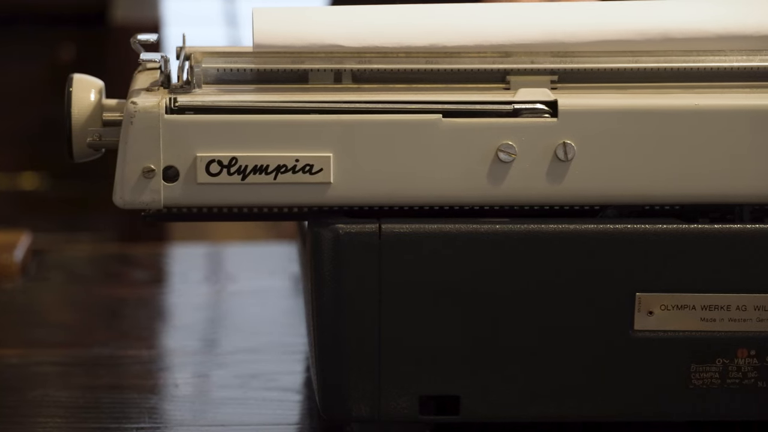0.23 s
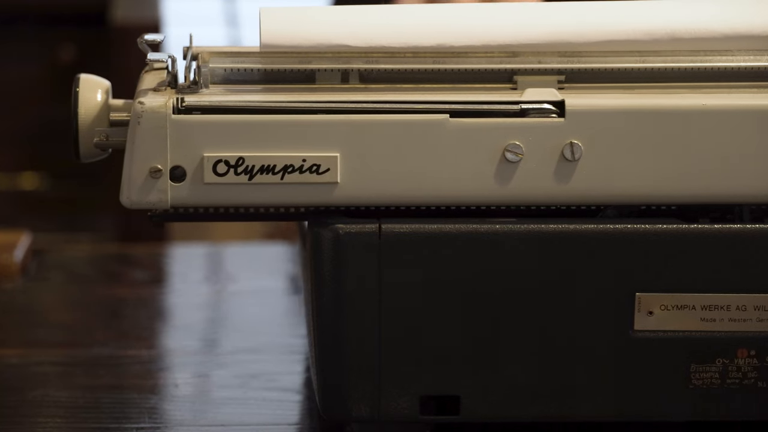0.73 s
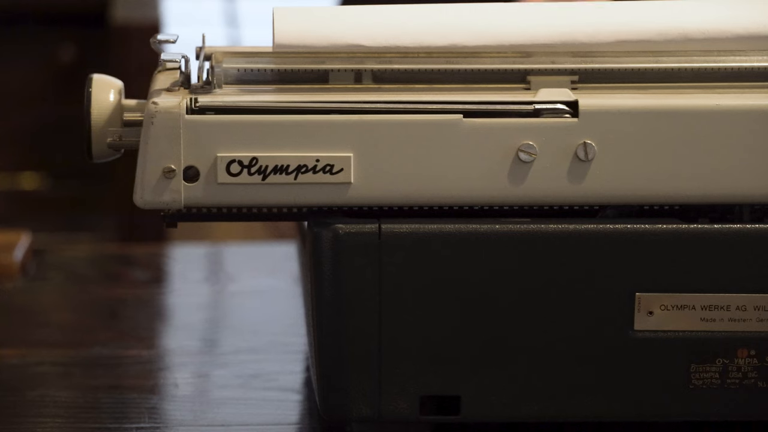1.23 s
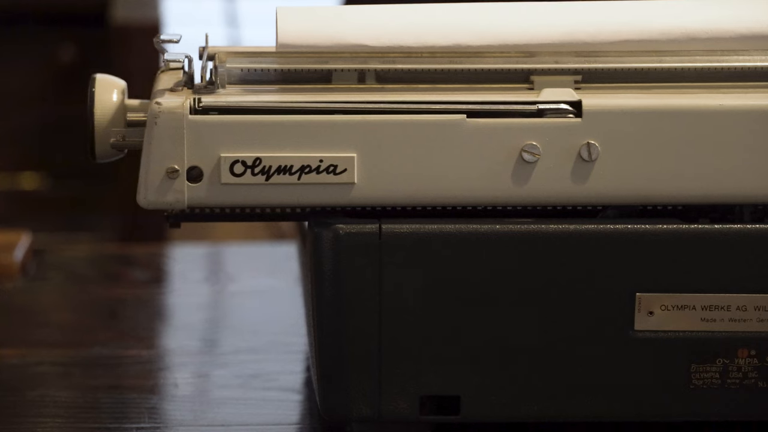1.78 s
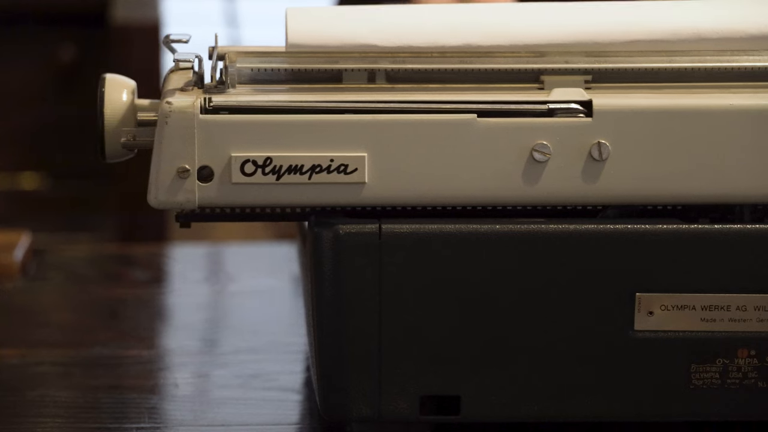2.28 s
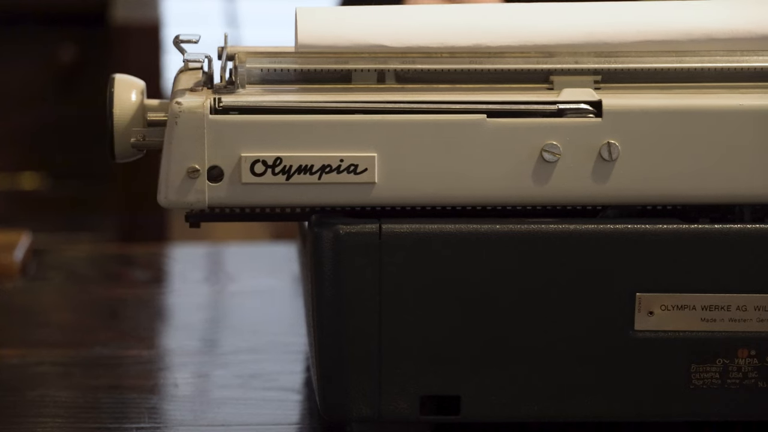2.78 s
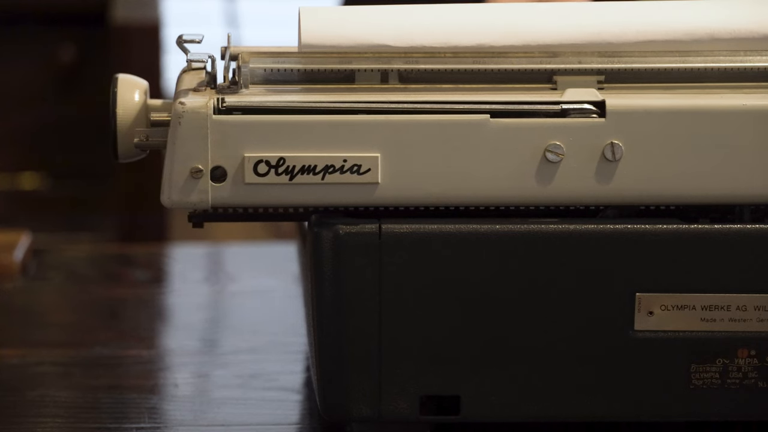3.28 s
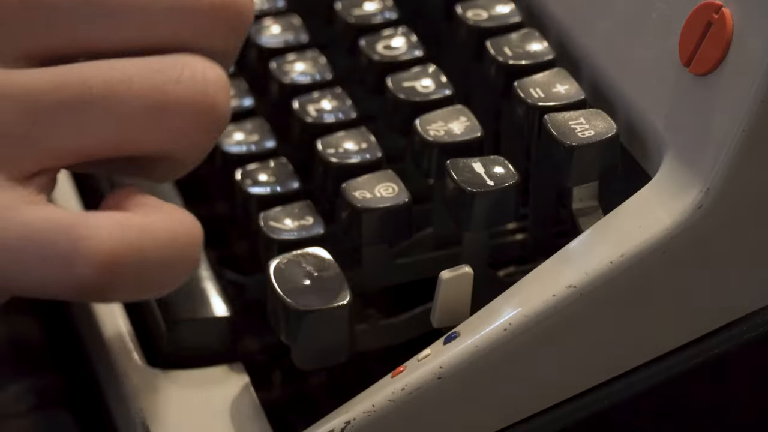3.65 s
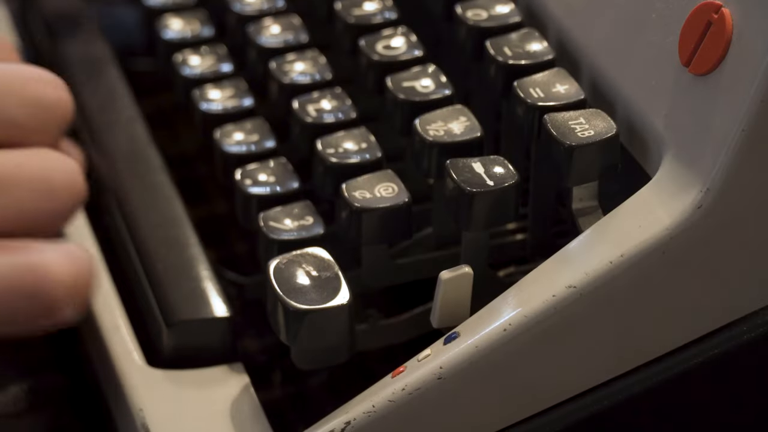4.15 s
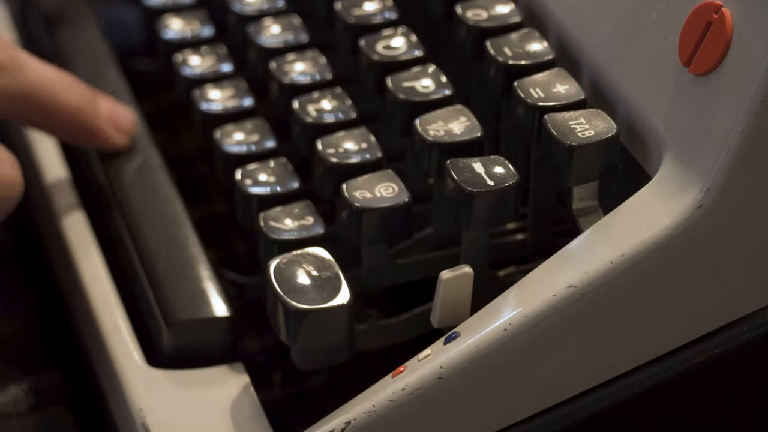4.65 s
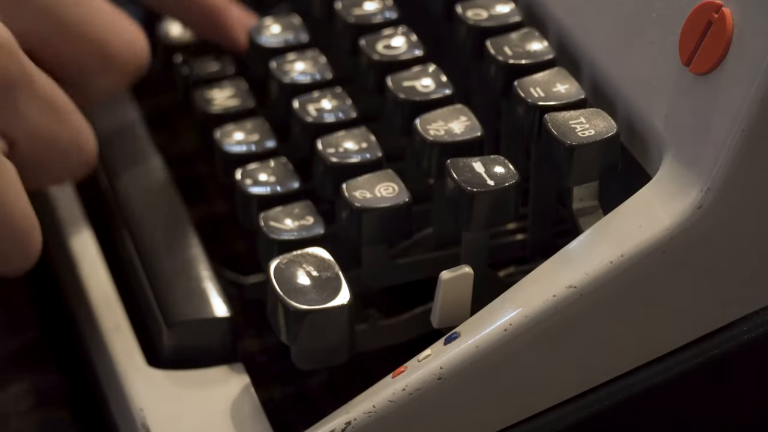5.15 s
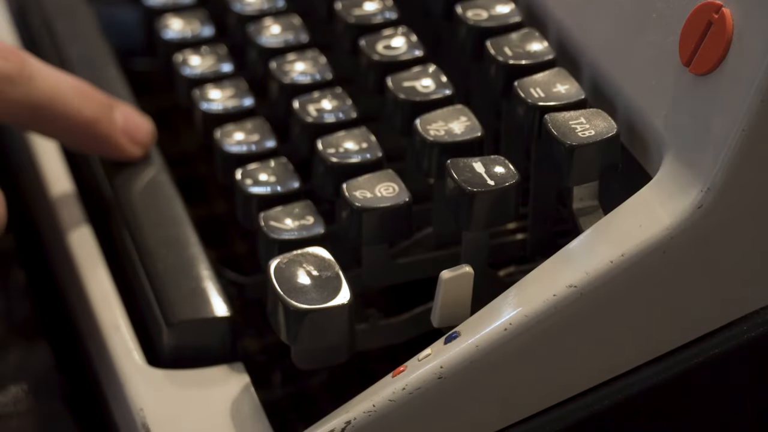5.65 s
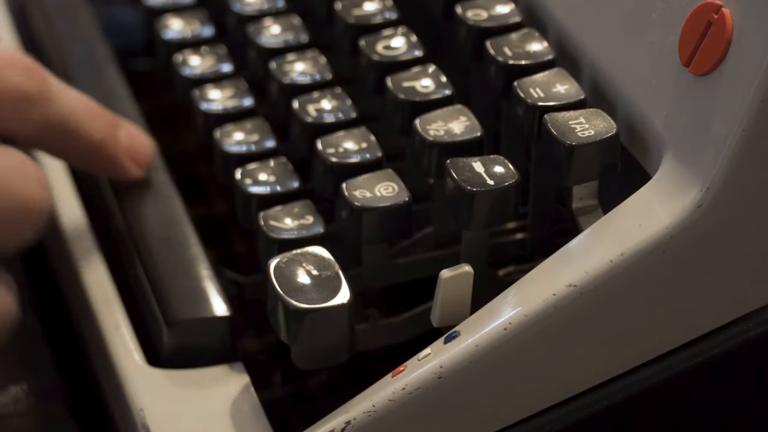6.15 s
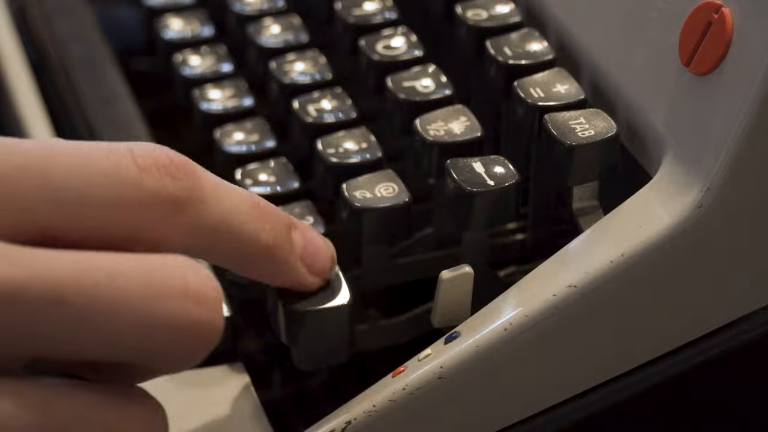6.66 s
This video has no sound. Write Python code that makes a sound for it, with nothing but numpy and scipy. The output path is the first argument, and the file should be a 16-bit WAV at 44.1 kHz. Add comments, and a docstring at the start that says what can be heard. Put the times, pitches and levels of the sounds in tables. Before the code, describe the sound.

A manual typewriter clacks steadily with metallic rattles and heavy shift clunks, then thins to scattered strokes with short pauses.

```python
"""Manual typewriter on a wooden table

Heard first from behind the carriage, over a low, wavering rumble, then from beside the keys.
A key flings its type bar up, the slug cracks on the platen, and springs and carriage rattle on
while the frame booms. The shift drops and lifts the type basket with heavy clunks."""
import sys
import numpy as np
from scipy import signal
from scipy.fft import rfft, irfft, next_fast_len
from scipy.io import wavfile
from scipy.ndimage import uniform_filter1d

SR = 44100
rng = np.random.default_rng(int(sys.argv[2]) if len(sys.argv) > 2 else 0)


def to_wav(sig):
    """Store sig (one row per channel, or 1-D mono) as 16-bit WAV at the path in sys.argv[1].

    Samples outside -1..1 are clipped; the rate is SR.
    """
    pcm = np.clip(np.atleast_2d(sig), -1, 1) * 32767
    pcm = np.round(pcm).astype(np.int16)
    wavfile.write(sys.argv[1], SR, pcm.T)  # frames by channels


N = 305172
T = np.arange(int(0.7 * SR)) / SR  # time within one event, s


def amp(db):
    """Decibels to gain."""
    return 10 ** (np.asarray(db) / 20)


def unit(x):
    """Scale to rms 1."""
    return x / np.sqrt(np.mean(x ** 2) + 1e-20)


def along(points, hz):
    """Interpolate (freq_hz, value) points on a log axis."""
    freqs_hz, values = np.transpose(points)
    return np.interp(np.log(hz + 1), np.log(freqs_hz), values)


def filtered(x, gain):
    """Zero-phase filter with response gain(hz)."""
    size = next_fast_len(x.shape[-1] + 8192)
    return irfft(rfft(x, size) * gain(np.fft.rfftfreq(size, 1 / SR)), size)[..., :x.shape[-1]]


def hiss(spectrum):
    """Steady mid and side noise, rms 1."""
    return unit(filtered(rng.standard_normal((2, N)), lambda hz: amp(along(spectrum, hz))))


def colour(x, spectrum, peaks=(), size=8192):
    """Minimum-phase body response of unit energy."""
    hz = np.fft.rfftfreq(size, 1 / SR)
    peaks_db = sum(db / (1 + (2 * (hz - centre) / width) ** 2) for centre, width, db in peaks)
    cepstrum = irfft(np.log(amp(along(spectrum, hz) + peaks_db)))
    cepstrum[1:size // 2] *= 2
    cepstrum[size // 2 + 1:] = 0
    response = irfft(np.exp(rfft(cepstrum)))
    return signal.fftconvolve(x, response[None] / np.linalg.norm(response), axes=1)[:, :N]


def add(track, start_s, sound):
    """Mix a sound in, cropped to the track."""
    i = round(start_s * SR)
    part = sound[..., max(-i, 0):N - i]
    track[:, max(i, 0):max(i, 0) + part.shape[-1]] += part


def fade(t60_s, t=T):
    """Exponential decay."""
    return np.exp(-np.log(1000) * t / t60_s)


def rise(attack_s):
    """Exponential onset."""
    return 1 - np.exp(-T / attack_s)


def grains(depth_db, samples):
    """Uneven gain, rms 1: loose parts chatter in tiny random bursts."""
    flicker = unit(uniform_filter1d(rng.standard_normal(len(T)), size=samples))
    return unit(amp(depth_db * flicker))


def burst(t60_s, tail_db, tail_t60_s, attack_s):
    """A contact: brief noise, then a tail of chatter from the parts it jolted."""
    chatter = amp(tail_db) * fade(tail_t60_s) * grains(depth_db=3.5, samples=100)
    envelope = (fade(t60_s) + chatter) * rise(attack_s)
    noise = rfft(rng.standard_normal((2, len(T))))
    # each small part has its own treble resonances
    tint_db = 3.5 * unit(uniform_filter1d(rng.standard_normal(noise.shape[1]), size=350))
    treble = along([(1000, 0.1), (7000, 1)], np.fft.rfftfreq(len(T), 1 / SR))
    contact = irfft(noise * amp(tint_db * treble), len(T)) * envelope
    return contact * np.linalg.norm(envelope) / np.linalg.norm(contact, axis=1, keepdims=True)


def ring(modes, attack_s, detune):
    """Damped modes, with random strength, tuning and phase on each strike."""
    hz, db, t60_s = np.transpose(modes)[:, :, None]
    strength, pitch, phase = rng.standard_normal((3, len(modes), 1))
    gain = amp(db + 1.85 * strength)
    waves = gain * np.sin(2 * np.pi * (hz * (1 + detune * pitch) * T + phase)) * fade(t60_s)
    return waves.sum(0) * rise(attack_s) * np.sqrt(2) / np.linalg.norm(gain)


def wash(decays):
    """Mid and side noise with a decay time per frequency."""
    hz, t, bins = signal.stft(rng.standard_normal((2, len(T))), SR, nperseg=256)
    decayed = bins * fade(along(decays, hz)[:, None], t)
    return signal.istft(decayed, SR, nperseg=256)[1][:, :len(T)]


# background spectrum: freq_hz, level_db
AIR_SPECTRUM = [(12, -56), (20, -29.5), (49, -1), (68, 7), (88, -8), (134, -2.5), (262, -3.5), (410, -3.5),
                (590, -13.5), (738, -16.5), (923, -18), (1440, -25), (5850, -34), (16000, -40)]


def room_air():
    """Faint, steady rumble and hiss."""
    return amp(-44) * hiss(AIR_SPECTRUM)


# room decay: freq_hz, t60_s
ROOM_DECAY = [(100, 0.82), (700, 0.42), (3000, 0.48), (8000, 0.4), (15000, 0.26)]


def reverb(direct):
    """The room answers the mid channel with a diffuse tail."""
    tail = wash(ROOM_DECAY) * rise(0.014)
    return signal.fftconvolve(direct[:1], tail / np.linalg.norm(tail[0]), axes=1)[:, :N]


# rumble envelope: time_s, level_db
RUMBLE_LEVEL = [(0.0, -23), (0.05, -8), (0.25, -18), (0.45, -12), (0.7, -13.5), (1.07, -6.5), (1.13, -18.5),
                (1.36, -17.5), (1.5, -11), (3.58, -11.5)]
DIP_DELAY_S, DIP_WIDTH_S, DIP_DB = 0.034, 0.033, 13


def low_rumble(centre_hz, wander_hz, gain):
    """A low, wavering rumble, ducked briefly after each loud strike as by a limiter."""
    t = np.arange(N) / SR
    dips = sum(np.exp(-((t - s - DIP_DELAY_S) / DIP_WIDTH_S) ** 2) for s, *_ in STROKES)
    level_db = np.interp(t, *np.transpose(RUMBLE_LEVEL)) - DIP_DB * dips
    pitch_hz = centre_hz + wander_hz * unit(filtered(rng.standard_normal(N), lambda hz: hz < 18))
    return gain * amp(level_db) * np.sin(2 * np.pi * np.cumsum(pitch_hz) / SR)


# skin on keys: freq_hz, level_db
RUB_SPECTRUM = [(300, -4), (800, 14), (1300, 0), (2600, 5.5), (4000, -5), (7000, -23), (16000, -38)]
SQUEAK_SPECTRUM = [(1500, -37), (1950, -6), (2130, 2), (2320, -15), (3000, -44)]
# fingertip brushes: centre_s, length_s, rub_db, squeak_db
BRUSHES = [(4.75, 0.033, -75, -55), (4.828, 0.15, -47.5, -72), (5.118, 0.039, -60, -53),
           (6.252, 0.085, -56.5, -58)]


def fingers():
    """Skin slides over the key tops and squeaks where it sticks."""
    t = np.arange(N) / SR
    rub, squeak = hiss(RUB_SPECTRUM), hiss(SQUEAK_SPECTRUM)
    return sum((amp(rub_db) * rub + amp(squeak_db) * squeak) * np.exp(-(2 * (t - s) / length_s) ** 2)
               for s, length_s, rub_db, squeak_db in BRUSHES)


def spring_twitches(strokes, count=5, within_s=0.2, level_db=-12, scatter_db=4.5, zing_db=-8.5):
    """Click rows: springs twitch at random in each rattle, at levels relative to it."""
    delays_s = within_s * rng.random((len(strokes), count))
    levels_db = level_db + scatter_db * rng.standard_normal(delays_s.shape)
    return [(s + delay_s, rattle_db + db, rattle_db + db + zing_db)
            for (s, *_, rattle_db, _), delays, levels in zip(strokes, delays_s, levels_db)
            for delay_s, db in zip(delays, levels)]


# type bars fall on their rest: start_s, clack_db, boom_db
BAR_RETURNS = [(-0.02, -18, -16), (0.4849, -19, -21), (0.7015, -19, -8), (1.0297, -39.5, -46),
               (1.5622, -16.5, -17.5), (1.7772, -19.5, -15), (2.0745, -19, -16), (2.378, -18.5, -26.5),
               (2.9641, -20, -15), (3.1884, -20.5, -14), (3.4349, -19.5, -17.5), (3.799, -20.5, -29.5),
               (4.0821, -19.5, -32.5), (4.3289, -22.5, -30), (5.6245, -27, -27), (5.861, -22, -29)]


def bar_bounces(returns, contacts=4, hop_s=0.0115, shrink=0.85, loss_db=5.5, zing_db=-12.5):
    """Click rows: a fallen bar bounces, each hop shorter and weaker."""
    hops = np.arange(contacts)
    delays_s = np.cumsum(hop_s * shrink ** hops) - hop_s
    losses_db = loss_db * hops + 0.5 * rng.standard_normal((len(returns), contacts))
    return [(s + delay_s, db - loss, db - loss + zing_db)
            for (s, db, _), losses in zip(returns, losses_db)
            for delay_s, loss in zip(delays_s, losses)]


# shift linkage contacts: delay_s, offset_db
SHIFT_CLATTER = [(0.0191, 0.5), (.034, -0.5)]


def shift_clatter(shifts, zing_db=-17):
    """Click rows: the linkage clatters twice after the basket lands."""
    return [(s + delay_s, db + offset_db, db + offset_db + zing_db)
            for s, _, _, db in shifts for delay_s, offset_db in SHIFT_CLATTER]


# basket meets its stop: start_s, clunk_db, boom_db, clatter_db
SHIFTS = [(0.0749, -21.5, -18, -29), (0.6635, -25.5, -22.5, -20.5), (0.8244, -23, -17, -36),
          (2.434, -27.5, -28, -40.5), (2.452, -25, -14, -13.5), (2.5738, -23.5, -18.5, -25.5),
          (6.4087, -25, -18, -9.5), (6.5638, -23, -17.5, -25.5)]
# basket modes: pitch_hz, level_db, t60_s
BASKET_MODES = [(680, 7, 0.12), (604.4, 3, 0.16), (720, -3, 0.16), (932, 0, 0.16), (1090, 0, 0.135),
                (1340, -13, 0.18)]
# housing resonances: centre_hz, width_hz, gain_db
HOUSING_PEAKS = [(121, 87, 2), (659, 36, 8.5), (1063, 49, 1), (1300, 46, -0.5), (2940, 270, 7.5)]
# heavy contacts: freq_hz, level_db
CLUNK_SPECTRUM = [(60, -13.5), (200, 4.5), (450, -3.5), (680, -0.5), (1000, -3), (1600, -6.5), (2800, -15),
                  (5000, -22), (8500, -23.5), (11000, -35), (16000, -41)]
KNOCK_SPECTRUM = [(80, -15.5), (200, 7), (400, 0), (800, -3.5), (1300, -6.5), (2500, -14.5), (6000, -31.5),
                  (16000, -42)]


def thumps(slugs, shifts, knocks, frame_modes):
    """Heavy blows knock the housing and set the frame booming on the table."""
    clunk, knock, tones = np.zeros((3, 2, N))
    for s, boom_db in slugs:
        add(tones, s, amp(boom_db) * ring(frame_modes, attack_s=0.0044, detune=0.013))
    for s, db, boom_db, _ in shifts:
        add(clunk, s, amp(db) * burst(t60_s=0.14, tail_db=-1.5, tail_t60_s=0.47, attack_s=0.002))
        # the basket rocks back and lands again
        settle = burst(t60_s=0.07, tail_db=-12, tail_t60_s=0.3, attack_s=0.0005)
        add(clunk, s + 0.021, amp(db + 0.5) * settle)
        add(tones, s, amp(db + 5.5) * ring(BASKET_MODES, attack_s=0.0041, detune=0.012))
        # its weight keeps pushing: a slower, larger boom
        add(tones, s, 2 * amp(boom_db) * ring(frame_modes, attack_s=0.032, detune=0.025))
    for s, db, boom_db in knocks:
        add(knock, s, amp(db) * burst(t60_s=0.11, tail_db=-2, tail_t60_s=0.53, attack_s=0.000745))
        add(tones, s, amp(boom_db) * ring(frame_modes, attack_s=0.0037, detune=0.0597))
    return colour(clunk, CLUNK_SPECTRUM, HOUSING_PEAKS) + colour(knock, KNOCK_SPECTRUM) + tones


# light steel contacts: freq_hz, level_db
CLACK_SPECTRUM = [(200, 2.5), (900, -1.5), (2000, 2), (4000, 0.5), (7500, -3.5), (10000, -8),
                  (16000, -38.5)]
ZING_SPECTRUM = [(2000, -67), (7000, 0.5), (10000, -2), (12000, 0.5), (14000, 6), (16000, -4)]
# type bar modes: pitch_hz, level_db, t60_s
BAR_LOW_MODES = [(3160, -9, 0.065), (2920, -18, .06)]
BAR_HIGH_MODES = [(4780, 0, .11)]


def linkage(throws, trips, clicks):
    """Small steel parts meet with a clack and a bright zing; thrown type bars ping."""
    clack, zing, pings = np.zeros((3, 2, N))
    for s, db, zing_db, low_db, high_db in throws:
        add(clack, s, amp(db) * burst(t60_s=0.0061, tail_db=-7, tail_t60_s=0.71, attack_s=0.00052))
        add(zing, s, amp(zing_db) * burst(t60_s=0.021, tail_db=-9, tail_t60_s=0.21, attack_s=0.00031))
        add(pings, s, amp(low_db) * ring(BAR_LOW_MODES, attack_s=0.00044, detune=0.0015))
        add(pings, s, amp(high_db) * ring(BAR_HIGH_MODES, attack_s=0.00105, detune=0.001))
    for s, db, zing_db in trips:
        add(clack, s, amp(db) * burst(t60_s=0.03, tail_db=-16.5, tail_t60_s=0.2, attack_s=0.0012))
        add(zing, s, amp(zing_db) * burst(t60_s=0.025, tail_db=-10, tail_t60_s=0.17, attack_s=0.00015))
    for s, db, zing_db in clicks:
        add(clack, s, amp(db) * burst(t60_s=0.035, tail_db=-14, tail_t60_s=0.24, attack_s=0.0011))
        add(zing, s, amp(zing_db) * burst(t60_s=0.017, tail_db=-6, tail_t60_s=0.11, attack_s=0.00018))
    return colour(clack, CLACK_SPECTRUM) + colour(zing, ZING_SPECTRUM) + pings


# slug on platen: freq_hz, level_db
CRACK_SPECTRUM = [(100, -13.5), (500, 5), (1500, -5.5), (4000, 6), (8000, 4), (11000, -6.5), (16000, -24)]
# spring rattle decay: freq_hz, t60_s
RATTLE_DECAY = [(200, 0.61), (1500, 0.63), (6000, 0.53), (9000, 0.44), (15000, 0.37)]


def slug_strikes(strokes, rattle_spectrum, panel_peaks, swell_s):
    """The slug cracks on the platen; a grainy rattle swells in the springs and dies away."""
    crack, rattle = np.zeros((2, 2, N))
    for s, *_, crack_db, rattle_db, _ in strokes:
        impact = burst(t60_s=0.012, tail_db=-18.5, tail_t60_s=0.073, attack_s=0.0004)
        add(crack, s, amp(crack_db) * impact)
        springs = wash(RATTLE_DECAY) * grains(depth_db=1.2, samples=70) * rise(swell_s)
        add(rattle, s, amp(rattle_db) * springs)
    return colour(crack, CRACK_SPECTRUM) + colour(rattle, rattle_spectrum, panel_peaks)


# typed letters: strike_s, bar_flight_s, escapement_lead_s, key_db, low_ping_db, high_ping_db,
# escapement_db, crack_db, rattle_db, boom_db
STROKES = [(-0.17, 0.043, .009, -25, -30, -35, -17, -6, -19, -26),
           (0.342, .0404, 0.01, -19, -37, -44, -10.5, -3.5, -16, -18),
           (0.5543, 0.039, 0.012, -20.5, -23, -39, -12.5, -4.5, -18.5, -18),
           (0.7437, 0.029, 0.0069, -21, -31, -38, -13.5, -6, -18.5, -23),
           (0.8926, 0.032, 0.008, -31.5, -43, -40, -15, -11, -24, -29),
           (1.399, .0375, .008, -18.5, -13.5, -29, -8.5, -6, -14.5, -23),
           (1.6446, 0.057, 0.011, -20, -23, -25.5, -11, -6.5, -15.5, -20.5),
           (1.9143, 0.041, 0.0093, -21.5, -29, -30.5, -12, -2, -15, -25),
           (2.2087, 0.057, 0.012, -19, -29, -32, -11.5, -5.5, -19, -16),
           (2.811, 0.06, 0.014, -18.5, -24.5, -50, -16.5, -3, -20, -13.5),
           (3.0388, .0436, 0.0088, -32, -41, -38, -13, -2, -15, -30.5),
           (3.2876, 0.047, 0.0092, -19, -23, -21.5, -12.5, -4.5, -15, -27),
           (3.4712, .042, .0076, -33, -30, -35, -12.5, -5, -15, -24),
           (3.647, .044, 0.0096, -17.5, -31, -48, -12.5, -16, -20.5, -25.5),
           (3.9149, 0.058, 0.011, -23, -33, -45, -12.5, -11.5, -19, -23.5),
           (4.182, 0.043, 0.0091, -17, -26.5, -34, -11, -8, -18, -21.5),
           (5.4777, .0434, 0.012, -22.5, -27, -50, -15.5, -12, -18.5, -29),
           (5.6955, 0.062, 0.012, -27.5, -32, -50, -13.5, -8.5, -19.5, -27.5)]
KEY_ZING_DB, KEY_KNOCK_DB, KEY_BOOM_DB = -3, -10.5, -3
TRIP_ZING_DB, SLUG_BOOM_DB = -5, -23
STEP_DELAY_S, STEP_KNOCK_DB = 0.038, -16


def letter_events(strokes, clack_db, thud_db):
    """Rows per letter: key throws bar, escapement trips, slug lands, carriage steps and stops."""
    throws, trips, slugs, knocks = [], [], [], []
    for s, flight_s, lead_s, key_db, low_db, high_db, trip_db, crack_db, rattle_db, boom_db in strokes:
        throws.append((s - flight_s, key_db + clack_db, key_db + KEY_ZING_DB, low_db, high_db))
        knocks.append((s - flight_s, key_db + clack_db + KEY_KNOCK_DB, key_db + thud_db + KEY_BOOM_DB))
        trips.append((s - lead_s, trip_db + clack_db, trip_db + TRIP_ZING_DB))
        slugs.append((s, crack_db + thud_db + SLUG_BOOM_DB))
        knocks.append((s + STEP_DELAY_S, rattle_db + STEP_KNOCK_DB, boom_db))
    return throws, trips, slugs, knocks


# space bar and half-pressed keys: start_s, clack_db, zing_db, ping_db, knock_db, boom_db
KEY_TAPS = [(1.0727, -22, -20, -23.5, -30, -26.5), (1.197, -33, -51.5, -38, -38, -25),
            (2.2884, -27, -17, -38, -28.5, -17), (2.639, -30.5, -63, -55, -37, -42.5),
            (4.4889, -44, -51.5, -58, -35.5, -34), (5.631, -22, -33.5, -30, -40.5, -35)]
# stray springs and levers: start_s, clack_db, zing_db
STRAY_TICKS = [(0.1072, -45, -32.5), (0.1372, -29, -24), (0.1556, -42, -31), (1.0382, -43, -28.5),
               (1.2262, -34, -48), (1.3386, -32.5, -66.5), (1.7382, -19, -42.5), (1.7872, -32, -30),
               (1.8334, -20.5, -38), (2.096, -17.5, -35.5), (2.065, -39.5, -30), (2.1224, -31, -27),
               (2.3352, -30, -30), (3.014, -14.5, -27), (3.7696, -22, -46), (5.2196, -46, -38.5),
               (5.246, -47.5, -39.5), (5.5794, -22, -33)]
# shift lever modes: pitch_hz, level_db, t60_s
LEVER_MODES = [(2360, -13, .15), (4320, -2, 0.04)]
LEVER_SLACK_S, LEVER_CLINK_DB = 6.408, -23
RETURN_KNOCK_DB = -8


def typewriter(start_s, stop_s, rattle_spectrum, panel_peaks, frame_modes,
               swell_s, room_db, clack_db, thud_db):
    """Mid and side of all events in a time span; clack_db and thud_db are trims for the side heard."""
    strokes, returns, shifts, taps, ticks = (
        [row for row in table if start_s <= row[0] < stop_s]
        for table in (STROKES, BAR_RETURNS, SHIFTS, KEY_TAPS, STRAY_TICKS))
    throws, trips, slugs, knocks = letter_events(strokes, clack_db, thud_db)
    knocks += [(s, db + clack_db + RETURN_KNOCK_DB, boom_db) for s, db, boom_db in returns]
    knocks += [(s, db, boom_db) for s, *_, db, boom_db in taps]
    clicks = bar_bounces(returns) + spring_twitches(strokes) + shift_clatter(shifts)
    clicks += [row[:3] for row in taps] + ticks
    direct = linkage(throws, trips, [(s, db + clack_db, zing_db) for s, db, zing_db in clicks])
    direct += thumps(slugs, shifts, knocks, frame_modes)
    direct += slug_strikes(strokes, rattle_spectrum, panel_peaks, swell_s)
    for s, _, _, ping_db, _, _ in taps:
        add(direct, s, amp(ping_db) * ring(BAR_LOW_MODES, attack_s=0.0005, detune=0.0024))
    if start_s <= LEVER_SLACK_S < stop_s:
        clink = ring(LEVER_MODES, attack_s=0.00061, detune=0.002)
        add(direct, LEVER_SLACK_S, amp(LEVER_CLINK_DB) * clink)
    return direct + amp(room_db) * reverb(direct)


# frame modes: pitch_hz, level_db, t60_s
REAR_FRAME = [(51.3, -4, 0.567), (85.8, -7.5, 0.49), (129.6, 0.5, 0.24), (162.16, -2, 0.43),
              (197.5, -10, 0.42), (233.8, -12.5, 0.32), (300.5, -15, 0.18), (453.2, -14, 0.2)]
FRONT_FRAME = [(59.1, -8, 0.49), (75.7, -15, 0.95), (116.8, 5.5, 0.27), (133.4, -5, 0.45), (171, -21, 0.53),
               (195.7, -10, 0.27), (298, -14.5, 0.47), (362.7, -0.5, 0.17)]
# rattle spectra: freq_hz, level_db
REAR_RATTLE = [(100, -5), (300, 0.5), (600, -8.5), (900, 3), (1300, -5), (1600, 3), (3000, 1), (4500, 2.5),
               (6500, 3.5), (8200, 2.5), (9500, -7.5), (12000, -14), (16000, -28.5)]
FRONT_RATTLE = [(100, -14), (330, -5.5), (550, -4), (1200, -3.5), (2000, -2), (3200, -0.5), (4300, -2.5),
                (6200, 0), (8000, -3.5), (10000, -5.5), (16000, -11.5)]
# spring and panel resonances: centre_hz, width_hz, gain_db
PANEL_PEAKS = [(1524, 80, 8.2), (1696, 45, 5.2), (1806, 67, 4.6), (2044, 126, 5), (2120, 130, 3.5),
               (2930, 53, 1.8), (3060, 58, 5.5), (3900, 610, 2.3), (4220, 60, 7), (5610, 110, 7.5),
               (5960, 110, 6.5)]
# stereo width at the keys: freq_hz, side_db
STEREO_WIDTH = [(60, -32), (200, -19.5), (700, -9.5), (2400, -5), (8000, -1.5), (15000, -3.5)]
# balance at the keys: freq_hz, left_minus_right_db
STEREO_BALANCE = [(200, -0.5), (1300, -1.5), (8000, -2), (15000, -4.5)]
MOVE_S = 3.586


def scene():
    """Mono behind the carriage, then stereo beside the keys, where the panels ring less."""
    air = room_air()
    rear = typewriter(-1, MOVE_S, REAR_RATTLE, PANEL_PEAKS, REAR_FRAME,
                      swell_s=0.022, room_db=-14, clack_db=0.5, thud_db=0)
    faint_peaks = [(hz, width_hz, 0.53 * db) for hz, width_hz, db in PANEL_PEAKS]
    front = typewriter(MOVE_S, N / SR, FRONT_RATTLE, faint_peaks, FRONT_FRAME,
                       swell_s=0.045, room_db=-12.5, clack_db=-5, thud_db=-13.5)
    # the last rear rattle dies away faintly on the key side
    mid, side = front + amp(-17) * rear + air + fingers()
    side = filtered(side, lambda hz: amp(along(STEREO_WIDTH, hz)))
    left_right = np.array([mid + side, mid - side])
    beside = filtered(left_right, lambda hz: amp(np.outer([0.5, -0.5], along(STEREO_BALANCE, hz))))
    behind = (rear + air)[0] + low_rumble(centre_hz=20.9, wander_hz=5.22, gain=1.11)
    return np.where(np.arange(N) / SR < MOVE_S, behind, beside)


CEILING, CUTOFF_HZ = 0.9, 16150


def record(dry):
    """Soft peak limiting, then a brick-wall low-pass."""
    rounded = dry / (1 + np.abs(dry / CEILING) ** 6) ** (1 / 6)
    return filtered(rounded, lambda hz: hz < CUTOFF_HZ)


dry = scene()
out = record(dry)
to_wav(out)
```